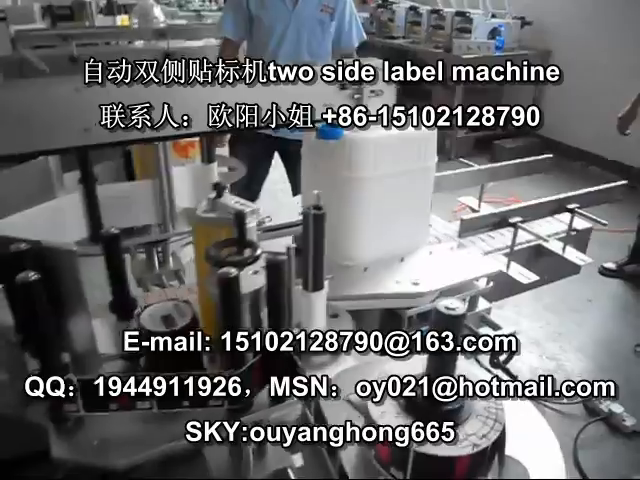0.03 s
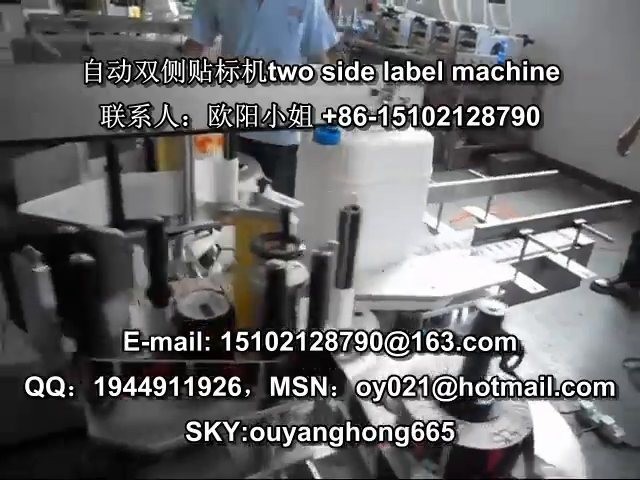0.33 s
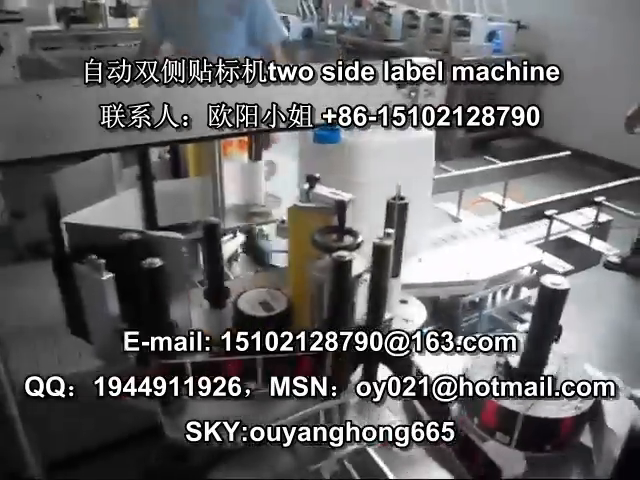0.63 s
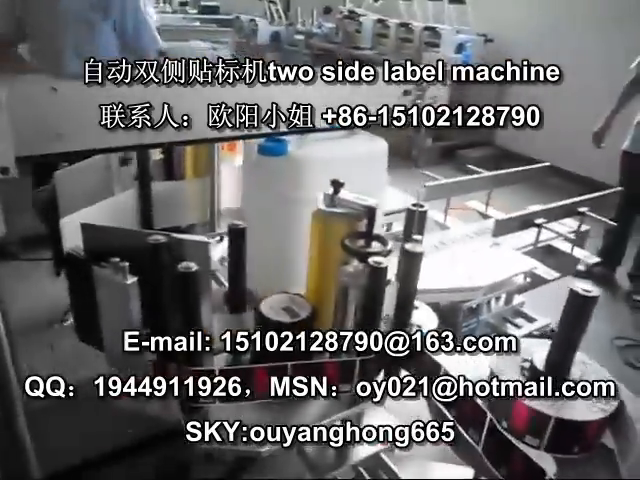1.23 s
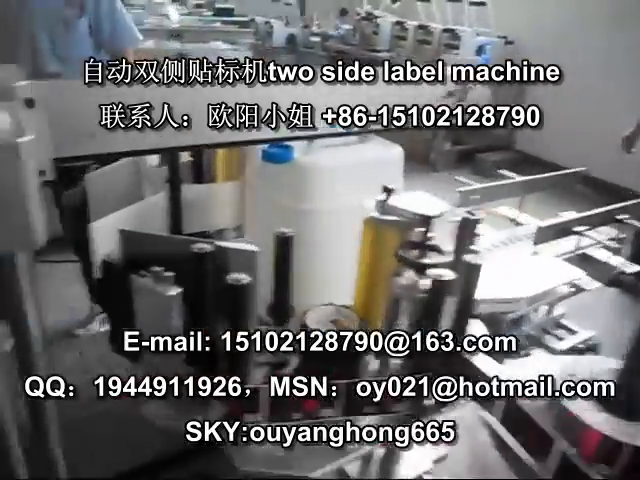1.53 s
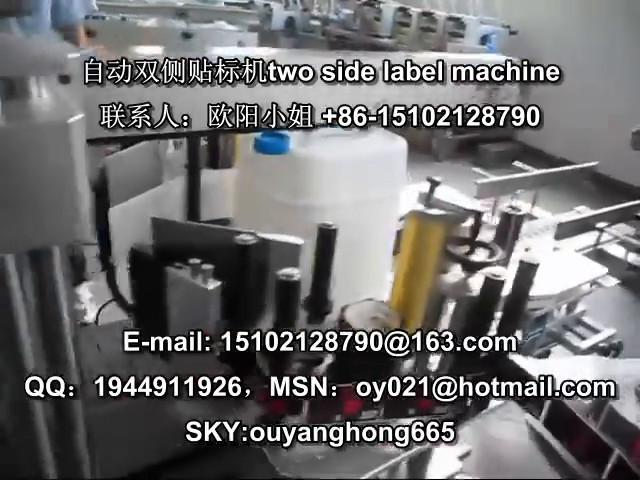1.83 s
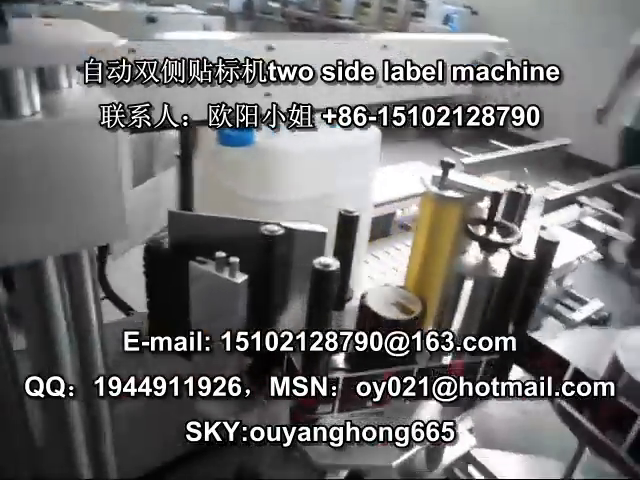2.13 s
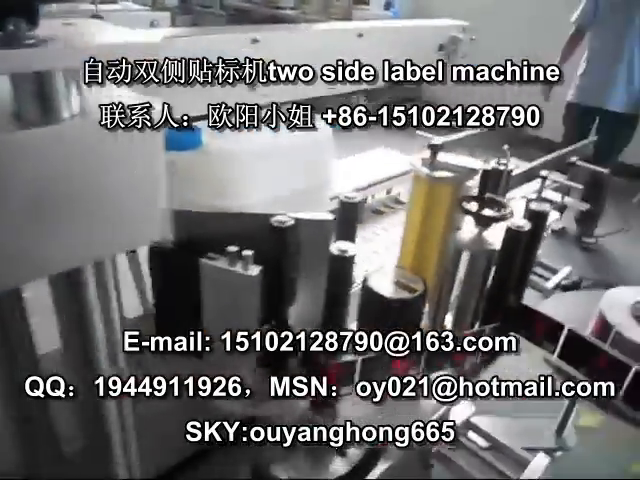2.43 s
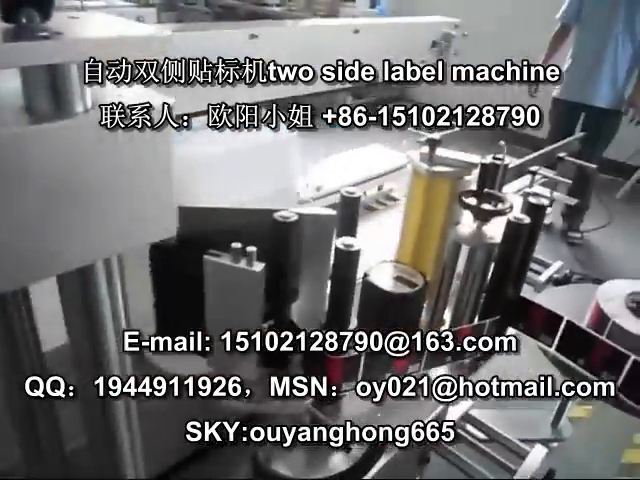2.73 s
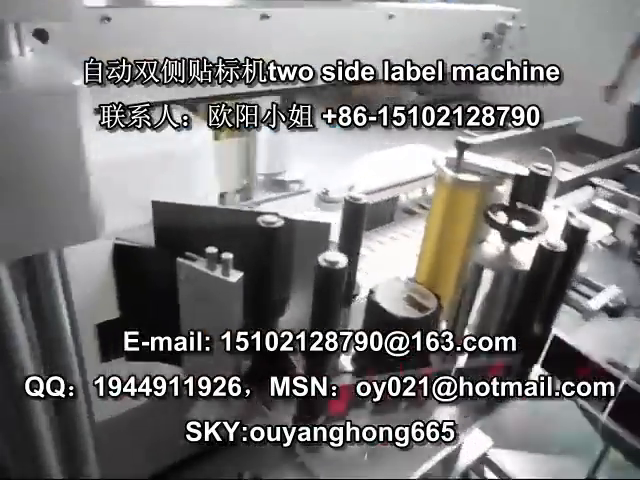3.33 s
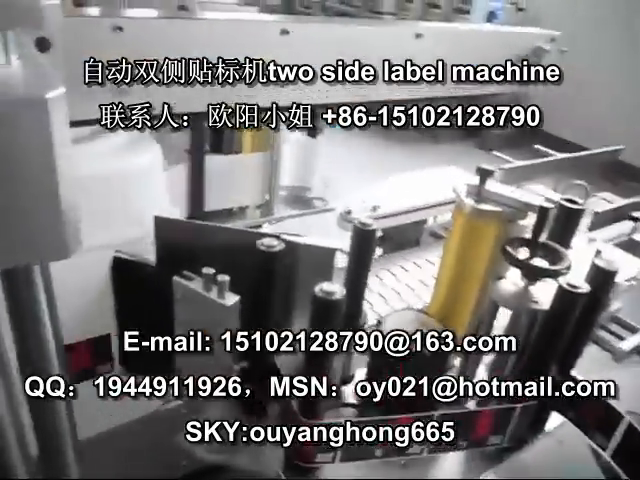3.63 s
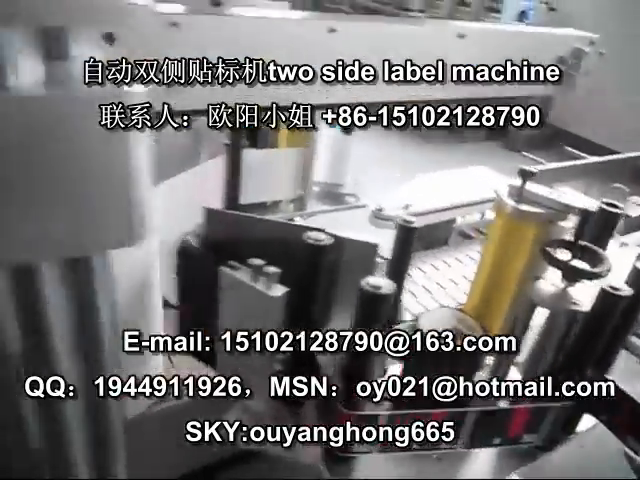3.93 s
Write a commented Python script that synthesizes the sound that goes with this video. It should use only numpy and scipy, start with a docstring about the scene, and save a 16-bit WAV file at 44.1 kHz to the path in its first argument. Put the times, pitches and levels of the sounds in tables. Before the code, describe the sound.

A labelling machine runs close up in a workshop, faint at first. From about 0.7 seconds its conveyor rumble swells over a low drone and hum, with a piercing, wavering motor whine and occasional ticks. Just after 3 seconds, sharp clacks and knocks open a bright air hiss lasting a third of a second. More clacks close it around 3.4 seconds, leaving a quieter, throbbing hum and whine.

```python
"""A bottle labelling machine runs in a workshop, close up and in mono.
Its conveyor rumbles and swells as a canister rides up, over a low drone and the hum of turning parts.
The motor drive whines at 4 kHz among thinner tones, while the mechanism ticks and clacks.
Near the end a third of a second of airy hiss bursts out between clacks and knocks of the frame,
and the machine falls back to a quieter, throbbing hum."""
import sys
import numpy as np
from scipy import signal
from scipy.io import wavfile

SR = 44100
rng = np.random.default_rng(int(sys.argv[2]) if len(sys.argv) > 2 else 0)


def output_pcm(signal):
    """Save a mono or channel-first signal as 16-bit PCM at the path in sys.argv[1].

    Samples are clipped to [-1, 1] before scaling.
    """
    pcm = np.clip(np.atleast_2d(signal).T, -1, 1) * 32767
    wavfile.write(sys.argv[1], SR, np.round(pcm).astype(np.int16))


N = 176400
TIME = np.arange(N) / SR


def from_db(db):
    """Decibels to gain."""
    return 10 ** (np.asarray(db) / 20)


def rms_one(x):
    """Scale to unit rms."""
    return x / np.sqrt(np.mean(x ** 2) + 1e-20)


def fader(rows, column=1):
    """Gain at every sample, riding a curve of dB over time."""
    points = np.transpose(rows)
    return from_db(np.interp(TIME, points[0], points[column]))


def gated_fader(rows):
    """A fader ride, muted before its first point and after its last."""
    return fader(rows) * (TIME > rows[0][0]) * (TIME < rows[-1][0])


def drift(rate_hz):
    """Slow random wander of spread 1."""
    hop = 40
    pole = np.exp(-2 * np.pi * rate_hz * hop / SR)
    slow = signal.lfilter([1], [1, -2 * pole, pole * pole], rng.standard_normal(N // hop + 2002))[2000:]
    return np.interp(np.arange(N) / hop, np.arange(len(slow)), rms_one(slow))


def band(x, low, high):
    """Butterworth band-pass."""
    edges = np.clip([low, high], 10, .45 * SR)
    return signal.sosfilt(signal.butter(2, edges, "band", fs=SR, output="sos"), x + 1e-18)


def coloured_noise(spectrum, flicker_db, flicker_hz):
    """Third-octave bands of noise, each flickering a little; rms 1."""
    hz, db = np.transpose(spectrum)
    edges = 22 * 2 ** (np.arange(29) / 3)
    white = rng.standard_normal((2, N))
    together = drift(flicker_hz)
    out = 0
    for k, (low, high) in enumerate(zip(edges, edges[1:])):
        centre = np.sqrt(low * high)
        flicker = flicker_db * (drift(flicker_hz) + .5 * together)
        if hz[0] / 1.2 < centre < hz[-1] * 1.2:
            gain = from_db(np.interp(np.log(centre), np.log(hz), db) + flicker)
            out = out + gain * band(white[k % 2], low, high)
    return rms_one(out)


def tone(hz, waver_hz):
    """A sine of rms 1 with slightly unsteady pitch."""
    cycles = np.cumsum(hz + waver_hz * drift(9.15)) / SR + rng.random()
    return np.sqrt(2) * np.sin(2 * np.pi * cycles)


# Conveyor fader rides, before trims: (time [s], rumble level [dB], treble level [dB])
CONVEYOR_RIDE = [(.1, -42, -49.5), (.3, -44.5, -51.5), (.44, -43.5, -50), (.6, -46, -49.5),
                 (.68, -38.5, -43), (.76, -31, -38), (1.05, -27.5, -33.5), (1.5, -22, -29.5),
                 (2.0, -20.5, -28), (2.55, -17.5, -26.5), (2.95, -16, -26), (3.1, -17.5, -25),
                 (3.17, -18.5, -35), (3.39, -18.5, -27), (3.44, -29.5, -41), (3.52, -30.5, -39),
                 (3.78, -28.5, -38.5), (4.0, -28, -39.5)]
# EQ of the rumble: (frequency [Hz], relative level [dB])
RUMBLE_EQ = [(20, -27.5), (42, -12), (70, -21), (95, -17.5), (125, -9), (165, -10), (200, -7.5),
             (250, -2.5), (340, -8), (430, -5), (530, -12.5), (700, -1.5), (850, -9.5), (1100, -16.5),
             (1500, -19)]
# Ringing of the shaken frame: (centre [Hz], width [Hz], relative level [dB])
FRAME_RESONANCES = [(237.7, 13.5, -14), (277.7, 21.3, -13.5), (429.6, 35, -13.5), (806, 70, -19)]
# EQ of the belt and roller rush: (frequency [Hz], relative level [dB])
RUSH_EQ = [(1100, 8), (1500, -3), (2000, 0), (2400, -1), (2900, -0.5), (4000, 0.5), (5000, -4.5),
           (6300, -3.5), (7200, -9), (8000, -8.5), (9000, -14.5), (10300, -13.5)]


def conveyor(rattles_per_s=60, rattle_hz=2450, rattle_decay_s=.002):
    """The conveyor rumbles and shakes its frame; belts and rollers rush on top with a fine rattle."""
    rumble = from_db(-3) * coloured_noise(RUMBLE_EQ, flicker_db=1.92, flicker_hz=11.7)
    for hz, width, db in FRAME_RESONANCES:
        rumble += from_db(db) * rms_one(band(rng.standard_normal(N), hz - width / 2, hz + width / 2))
    rush = from_db(1.5) * coloured_noise(RUSH_EQ, flicker_db=1.24, flicker_hz=20)
    contacts = (rng.random(N) < rattles_per_s / SR) * rng.uniform(0, 1, N) ** 2
    decays = signal.lfilter([1], [1, -np.exp(-1 / (rattle_decay_s * SR))], contacts)
    grit = band(decays * rng.standard_normal(N), rattle_hz / 2, rattle_hz * 2)
    treble = rush + from_db(-9.5) * rms_one(grit)
    return fader(CONVEYOR_RIDE) * rumble + fader(CONVEYOR_RIDE, column=2) * treble


# EQ of the workshop's low bed: (frequency [Hz], relative level [dB])
DRONE_EQ = [(25, -5), (45, 1), (75, -9), (120, -4), (160, -4), (270, 0), (420, -3)]
# Its fader ride: (time [s], level [dB])
DRONE_RIDE = [(.1, -53.5), (.62, -48), (.8, -43), (1.1, -36), (2.0, -34), (3.3, -33), (3.5, -50),
              (4.0, -49)]


def workshop_drone():
    """A low bed of noise with an electric hum in it."""
    bed = coloured_noise(DRONE_EQ, flicker_db=1.0, flicker_hz=8)
    mains = from_db(-5.5 + 2.9 * drift(10)) * tone(hz=120.6, waver_hz=2.48)
    return fader(DRONE_RIDE) * (bed + mains)


# Notes of the turning parts: (pitch [Hz], waver [Hz], relative level [dB])
HUM_NOTES = [(459, 6.1, -2.5), (683, 3.96, 0)]
# Their fader ride: (time [s], level [dB])
HUM_RIDE = [(.1, -82), (1.0, -44), (1.5, -37.5), (2.4, -32.5), (3.1, -28), (3.45, -32.5), (3.7, -37),
            (4.0, -43.5)]


def turning_parts(throb_hz=6.3, depth_db=3.5, crest_s=3.62):
    """Turning parts hum on two wavering notes with an even throb."""
    throb = from_db(depth_db * np.cos(2 * np.pi * throb_hz * (TIME - crest_s)))
    hum = sum(from_db(db + 2.2 * drift(15)) * tone(hz, waver) for hz, waver, db in HUM_NOTES)
    return fader(HUM_RIDE) * throb * hum


# Fader ride of the main whine, before trim: (time [s], level [dB])
WHINE_RIDE = [(.1, -52), (.17, -53), (.29, -62), (.33, -47), (.51, -48.5), (.57, -71), (.62, -60),
              (.67, -46), (.78, -37.5), (.92, -33.5), (1.04, -35.5), (1.12, -41.5), (1.25, -42),
              (1.34, -30), (1.53, -33), (1.62, -39), (1.69, -42), (1.745, -26), (1.79, -26.5), (1.89, -32),
              (2.1, -30.5), (2.25, -29.5), (2.4, -27), (2.48, -33), (2.58, -31.5), (2.78, -29), (2.91, -37),
              (3.24, -28), (3.4, -29.5), (3.44, -40.5), (3.62, -35), (3.8, -34), (3.9, -41), (3.96, -54),
              (4.0, -41)]


def drive_whine(trim_db=1.5):
    """The motor drive's switching sings on one piercing note."""
    return from_db(trim_db) * fader(WHINE_RIDE) * tone(hz=4001, waver_hz=1.1)


# Side tones that sound throughout: (pitch [Hz], relative level [dB])
IDLE_CLUSTER = [(1895, -46.5), (2487, -45), (4221, -51), (4264, -47), (4382, -48.5), (6347, -47.5),
                (6557, -54.5), (7833, -44), (7865, -46), (7930, -51), (8005, -49.5), (8075, -46.5),
                (8385, -48)]
# Their fader ride: (time [s], gain [dB])
IDLE_RIDE = [(.1, -21), (.6, -15.5), (.85, -4.5), (1.4, 1), (2.0, 2.5), (2.9, 5.5), (3.35, -4), (3.52, -5),
             (4.0, -7)]
# Side tones that come in under load: (pitch [Hz], relative level [dB])
LOAD_CLUSTER = [(1723, -46), (2277, -39.5), (2347, -43.5), (3736, -38.5), (6487, -46), (7413, -63),
                (7623, -45.5), (7720, -50), (8148, -42), (8285, -55), (8452, -53), (8592, -56), (9518, -53)]
# Their fader ride: (time [s], gain [dB])
LOAD_RIDE = [(.1, -24), (.6, -25), (.9, -5.5), (1.5, -2.5), (1.949, 3), (2.5, 3.5), (3.0, 5.5), (3.35, -6),
             (3.52, -10), (4.0, -11.5)]


def drive_side_tones(flutter_db=2.5):
    """Two clusters of thin tones around the drive's whine, each tone fluttering on its own."""
    out = np.zeros(N)
    for cluster, ride in (IDLE_CLUSTER, IDLE_RIDE), (LOAD_CLUSTER, LOAD_RIDE):
        for hz, db in cluster:
            fluttering = from_db(flutter_db * drift(7.3)) * tone(hz, waver_hz=2.97)
            out += fader(ride) * from_db(db) * rms_one(fluttering)
    return out


# Clack and tick cues: (time [s], peak level [dB], centre [Hz], width [octaves], 60 dB decay [s])
CLACK_CUES = [(.0872, -25, 3340, 2.7, .012), (.431, -34, 2500, 2.3, .03), (.565, -36, 4500, 1.8, .03),
              (.805, -21, 4800, 1.3, .015), (1.318, -17.5, 4600, 1, .02), (2.248, -13, 2200, 2.1, 0.028),
              (2.4, -16, 3200, 1.3, 0.04), (2.791, -10.5, 4750, 0.39, 0.031),
              (3.056, -6.5, 6500, 1.7, 0.024), (3.1045, -3, 4900, 7.4, .025),
              (3.405, -6.5, 1580, 0.93, 0.011), (3.438, -6.5, 2300, 1.9, 0.0052),
              (3.4429, -2, 3700, 3.7, 0.013), (3.4572, -10.5, 3960, 0.63, 0.014),
              (3.474, -15, 5500, 1.3, .008)]


def clacks():
    """Parts of the mechanism meet in short crunches of contact noise."""
    out, t = np.zeros(N + SR), np.arange(SR // 8) / SR
    for start, db, hz, octaves, t60 in CLACK_CUES:
        contact = rng.standard_normal(len(t)) * from_db(-60 * t / t60)
        spread = 2 ** (octaves / 2)
        crack = band(contact, hz / spread, hz * spread)
        out[int(start * SR):][:len(t)] += from_db(db) * crack / np.abs(crack).max()
    return out[:N]


def workshop_reverb(hits, t60_s=.65, predelay_s=.006):
    """The room answers each hit with a diffuse, dying tail."""
    t = np.arange(SR // 2) / SR
    tail = band(rng.standard_normal(len(t)), 190, 6400) * from_db(-60 * t / t60_s) * (t > predelay_s)
    return signal.fftconvolve(hits, tail / np.sqrt(np.sum(tail ** 2)))[:N]


# Fader ride of the lone side tone: (time [s], level [dB])
SWELL_RIDE = [(1.65, -58), (1.78, -40), (1.92, -32.5), (2.1, -32), (2.2, -45), (2.5, -42), (2.8, -57)]


def drive_swell():
    """One side tone of the drive swells just above the whine and fades again."""
    return gated_fader(SWELL_RIDE) * tone(hz=4382, waver_hz=1.1)


# Fader ride of the burst and its after-hiss: (time [s], level [dB])
AIR_RIDE = [(2.92, -44), (3.045, -29), (3.058, -18), (3.085, -24), (3.12, -19.5), (3.24, -18.5),
            (3.33, -20.5), (3.385, -16), (3.397, -12), (3.414, -28.5), (3.445, -23), (3.474, -35),
            (3.5, -37), (3.6, -47), (3.72, -46), (3.775, -39), (3.81, -50)]
# EQ of the hiss: (frequency [Hz], relative level [dB])
AIR_EQ = [(900, -9.5), (2000, -9.5), (3000, -12.5), (4300, 6), (5500, -4), (7500, -2), (9500, 3),
          (10500, -6)]


def air_burst():
    """A bright hiss opens, grows and shuts, leaking faintly for a moment afterwards."""
    return gated_fader(AIR_RIDE) * coloured_noise(AIR_EQ, flicker_db=1.55, flicker_hz=69)


# Frame knock cues: (time [s], peak level [dB], pitch [Hz], 60 dB decay [s])
KNOCK_CUES = [(3.0592, -3.5, 760, .014), (3.1045, -9, 740, 0.074), (3.1185, -8, 660, 0.01),
              (3.4063, -0.5, 1150, 0.0066), (3.4437, -8.5, 1700, 0.0056)]


def frame_knocks():
    """Each dull knock is one heavily damped note of the frame."""
    out, t = np.zeros(N + SR), np.arange(SR // 8) / SR
    for start, db, hz, t60 in KNOCK_CUES:
        out[int(start * SR):][:len(t)] += from_db(db - 60 * t / t60) * np.sin(2 * np.pi * hz * t)
    return out[:N]


def scene():
    """The mono mix on both channels, with only the hits sent to the reverb."""
    hits = clacks() + frame_knocks()
    bed = conveyor() + workshop_drone() + turning_parts()
    motor = drive_whine() + drive_swell() + drive_side_tones()
    mono = bed + motor + air_burst() + hits + from_db(-14) * workshop_reverb(hits)
    return np.array([mono, mono])


def record(dry, start_s=.084, cutoff_hz=10200):
    """Master chain: clipping at full scale, a silent lead-in and a steep treble cut."""
    live = np.clip(dry, -1, 1) * (TIME > start_s)
    treble_cut = signal.ellip(10, .3, 85, cutoff_hz, fs=SR, output="sos")
    return signal.sosfilt(treble_cut, live + 1e-18)


dry = scene()
out = record(dry)
output_pcm(out)
```